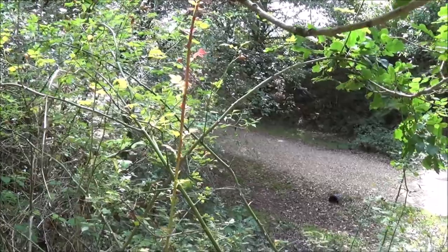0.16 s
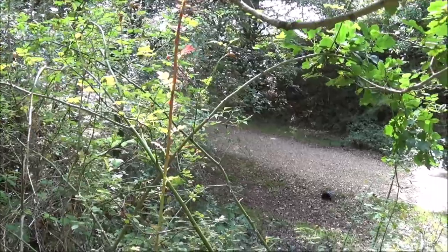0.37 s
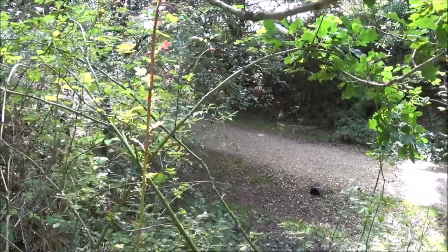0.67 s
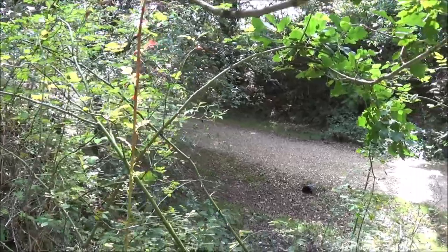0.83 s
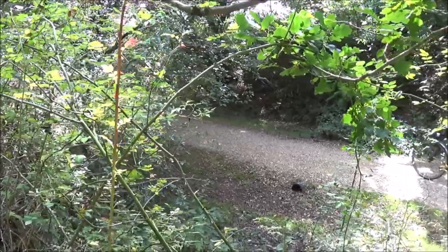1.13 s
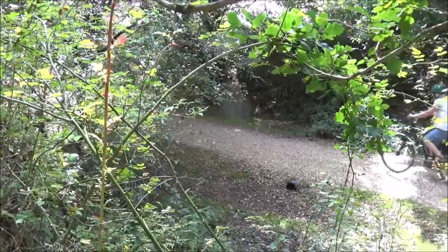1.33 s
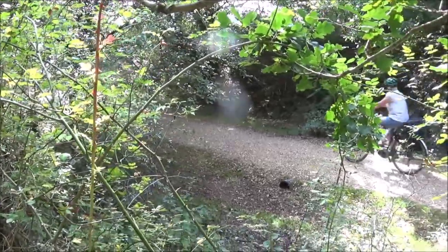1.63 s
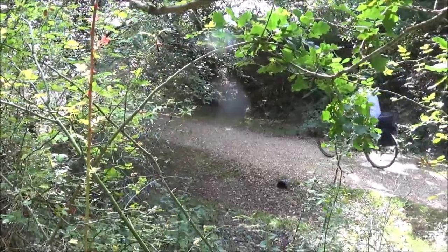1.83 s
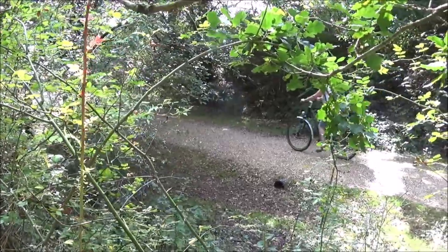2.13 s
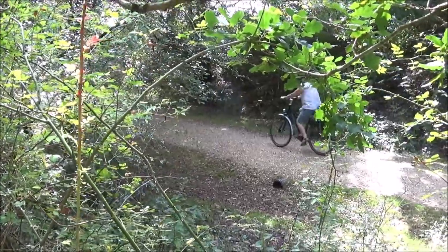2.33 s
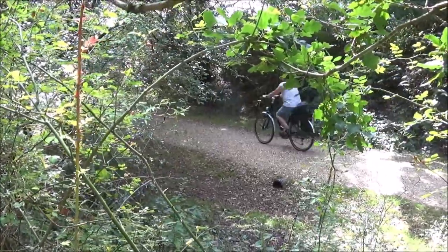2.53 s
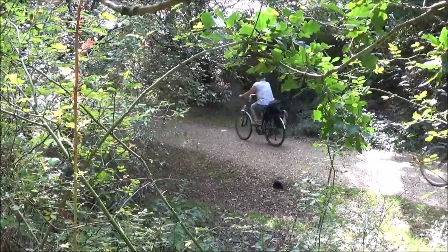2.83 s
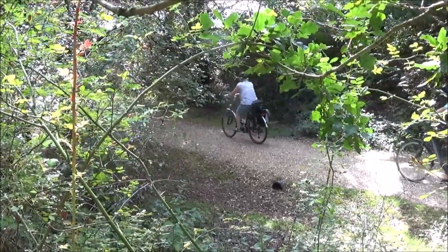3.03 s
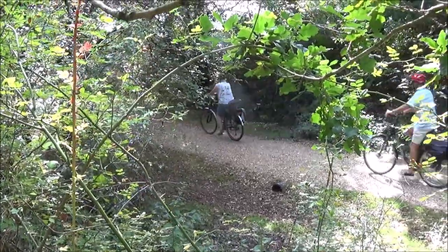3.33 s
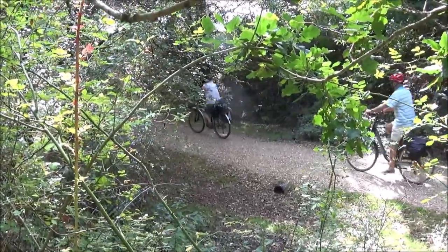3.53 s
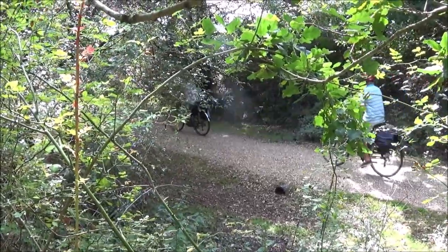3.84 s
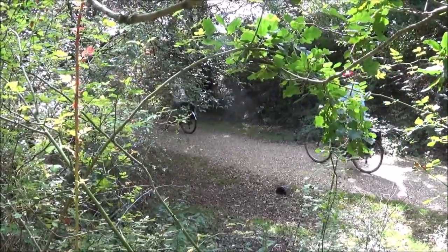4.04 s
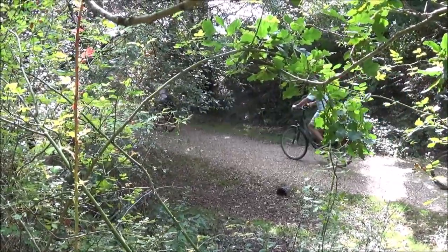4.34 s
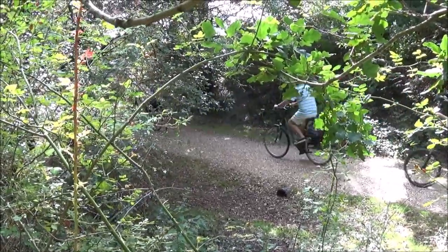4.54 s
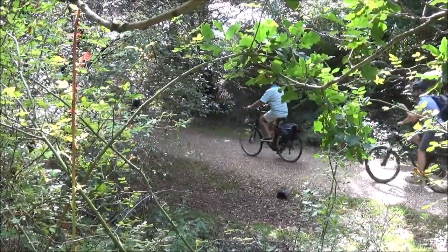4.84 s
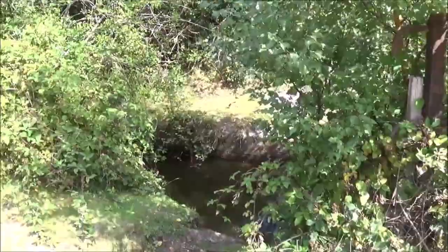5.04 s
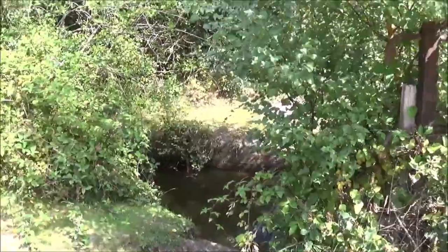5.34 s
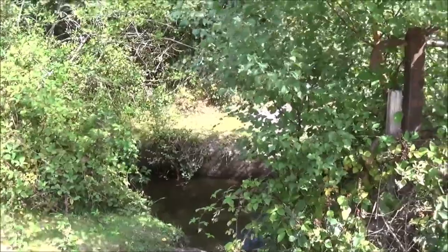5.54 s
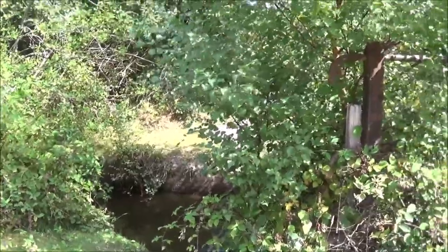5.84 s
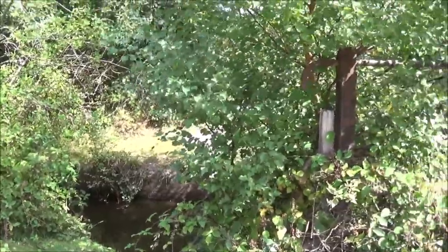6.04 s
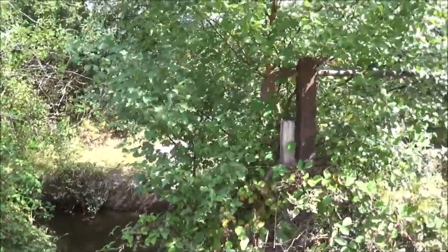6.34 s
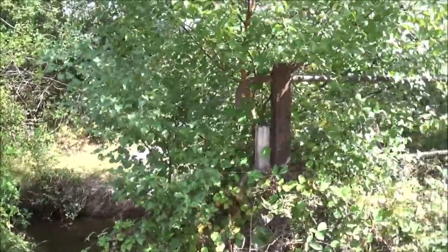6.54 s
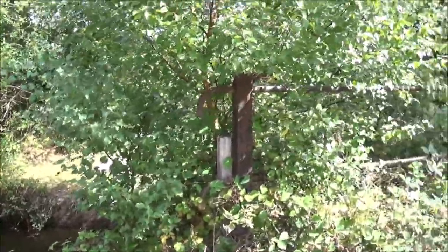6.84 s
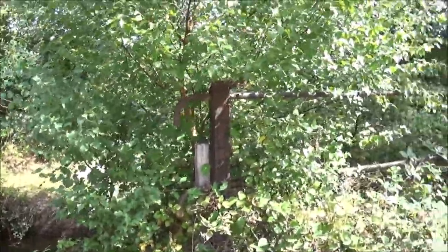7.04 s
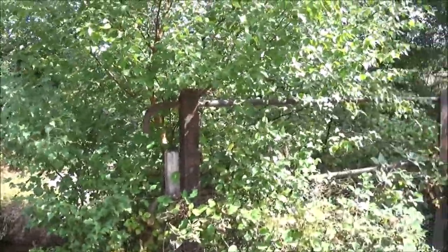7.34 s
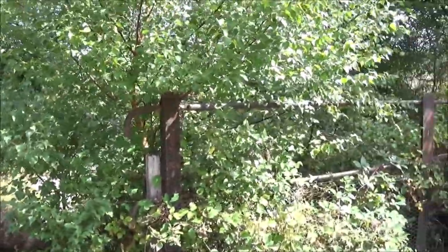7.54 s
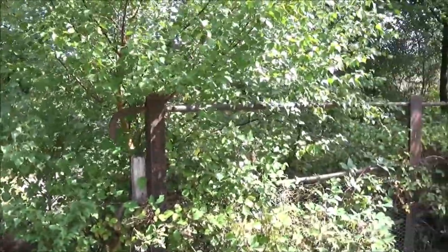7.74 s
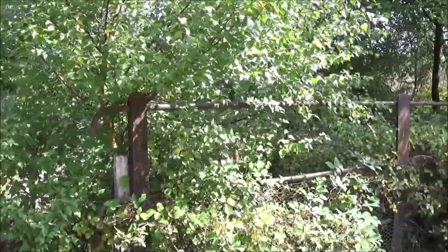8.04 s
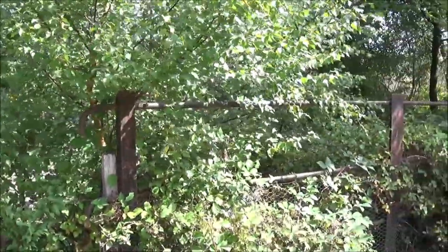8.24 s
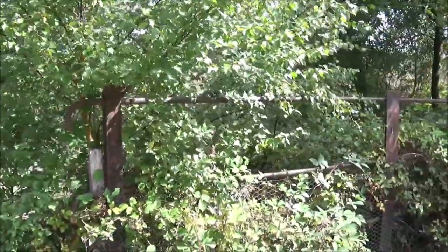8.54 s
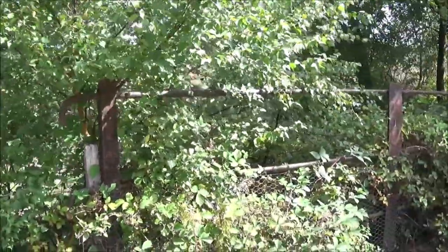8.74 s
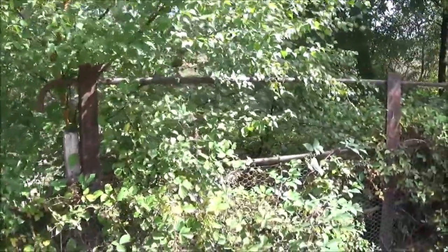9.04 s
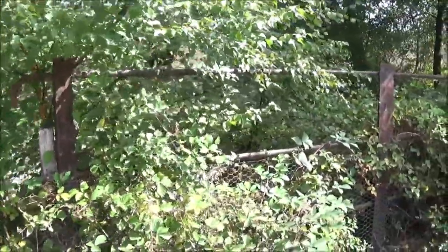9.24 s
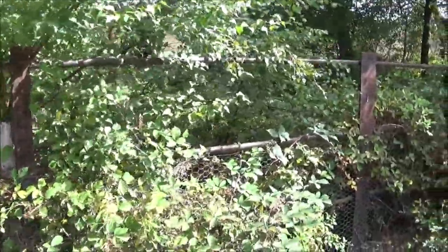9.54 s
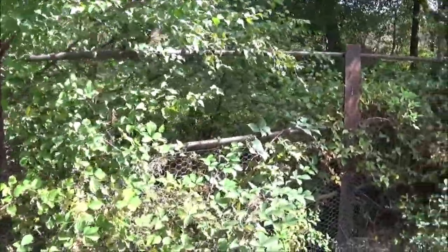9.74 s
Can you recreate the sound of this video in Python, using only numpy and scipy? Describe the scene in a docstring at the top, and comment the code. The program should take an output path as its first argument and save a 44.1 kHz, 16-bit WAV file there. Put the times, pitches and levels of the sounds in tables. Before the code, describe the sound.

Outdoor stereo sound, close to a gravel track. Coarse grinding and fine gritty crunching swell three or four times a second, scattered with hard ringing stone snaps and a short woodland echo. Halfway through it stops suddenly. A calm spot by water follows, with gentle hissing leaves and soft murmur, a thin high motor whine ticking rapidly, a few dry leaf scrapes and low wind puffs.

```python
"""Bicycles on gravel, then a quiet stream

Bicycles roll along a gravel path in a wood, starting on the right and drifting towards the middle:
grains of grit crunch in surges, three or four a second, and stones pop and crack as ringing snaps
with a short scattered tail. After five seconds the scene changes to a quiet spot by a stream:
steady noise for leaves and water, the faint pulsing whine of a zoom motor,
bursts of grains where undergrowth brushes by, and soft low puffs of air on the microphone."""
import sys
import numpy as np
from scipy import signal
from scipy.fft import rfft, irfft, next_fast_len
from scipy.io import wavfile

SR = 44100
rng = np.random.default_rng(int(sys.argv[2]) if len(sys.argv) > 2 else 0)


def log_audio(samples):
    """Write samples as a 16-bit WAV file to the path given in sys.argv[1]."""
    # one column per channel
    frames = np.atleast_2d(samples).T
    # limit to full scale, then quantise
    limited = np.clip(frames, -1, 1)
    pcm = np.round(limited * 32767).astype(np.int16)
    wavfile.write(sys.argv[1], SR, pcm)


N = 435708
TIME = np.arange(N) / SR
CUT_S = 5.027  # the path gives way to the stream


def from_db(db):
    """Decibels to gain."""
    return 10 ** (np.asarray(db) / 20)


def rms_one(x):
    """Scale to rms 1."""
    return x / np.sqrt(np.mean(x ** 2) + 1e-20)


def in_time(rows):
    """Each column of a curve at every sample."""
    s, *columns = np.transpose(rows)
    return [np.interp(TIME, s, column) for column in columns]


def at_hz(points, hz):
    """Read a spectrum on a log-frequency axis."""
    point_hz, values = np.transpose(points)
    return np.interp(np.log(hz + 1), np.log(point_hz), values)


def panned(pan_db):
    """Left and right gains for a left-right level difference (positive is left)."""
    pan_db = np.atleast_1d(pan_db)
    return from_db(np.array([pan_db, -pan_db]) / 2)


def drift(rate):
    """Random values of spread 1, drawn rate times a second and joined by straight lines."""
    return np.interp(TIME * rate, np.arange(4096), rng.standard_normal(4096))


def swell(s, length):
    """A bell-shaped rise and fall, its peak at s and its standard deviation length."""
    return np.exp(-.5 * np.minimum(((TIME - s) / length) ** 2, 100))


def response(spectrum, pitch_hz=1000, ring_db=0, octaves=0.33, tilt_db=0, size=2048):
    """Minimum-phase impulse response of a spectrum, with a broad resonance and a tilt about its pitch."""
    hz = np.arange(size // 2 + 1) * SR / size
    away = np.log2((hz + 1) / pitch_hz)
    resonance_db = ring_db / (1 + (away / octaves) ** 2)
    level_db = at_hz(spectrum, hz) + resonance_db + tilt_db * away
    # folding the cepstrum puts the energy as early as possible
    cepstrum = irfft(np.log(from_db(level_db)))
    cepstrum[0] /= 2
    return irfft(np.exp(rfft(2 * cepstrum[:size // 2], size)))


def through(x, impulse):
    """Pass a stereo signal through an impulse response."""
    return signal.oaconvolve(x, np.atleast_2d(impulse), axes=1)[:, :N]


def resonance(x, hz, width_hz):
    """A two-pole resonance: the narrower it is, the longer it rings."""
    r = np.exp(-np.pi * width_hz / SR)
    return signal.lfilter([1, 0, -1], [1, -2 * r * np.cos(2 * np.pi * hz / SR), r * r], x)


def grains(per_s, size_db, spread_db):
    """Random stereo clicks: many small, a few large, each from its own direction."""
    born = rng.random(N) < per_s / SR
    heights = from_db(size_db * np.minimum(rng.exponential(1, N), 4))
    signs = rng.choice([-1, 1], N)
    return born * heights * signs * panned(spread_db * rng.standard_normal(N))


# Likeness of the left and right channels. Each row: frequency in Hz, correlation from 0 to 1.
STEREO_LIKENESS = [(50, .85), (200, 0.98), (600, 0.91), (1400, 0.52), (3100, 0.55), (6500, 0.53),
                   (9000, 0.99), (15000, 1)]


def wash(spectrum):
    """Countless far sources merge into stereo noise; rms 1."""
    size = next_fast_len(N)
    hz = np.arange(size // 2 + 1) * SR / size
    alike = np.clip(at_hz(STEREO_LIKENESS, hz), 0, 1)
    mid, side = rfft(rng.standard_normal((2, size))) * from_db(at_hz(spectrum, hz))
    left_right = np.sqrt(1 + alike) * mid + np.sqrt(1 - alike) * side * [[1], [-1]]
    return rms_one(irfft(left_right, size)[:, :N])


# Colour of the wood's air. Each row: frequency in Hz, relative level in dB per Hz.
WOOD_COLOUR = [(20, -45), (50, -19), (100, -14), (200, -6), (500, 1.5), (1200, -2), (4000, 2.5),
               (8000, -18.5), (15500, -24.5)]


def wood():
    """The distant wood is a steady coloured noise."""
    return from_db(-47.5) * wash(WOOD_COLOUR)


# Low drone behind the path. Each row: time in seconds, rms of the upper hum in dB.
DRONE_LEVEL = [(0, -77), (1.2, -81), (1.6, -65.5), (2.1, -70), (2.5, -82), (5, -71.5)]


def drone(hz=184, width_hz=12, lower_db=-13):
    """Noise through narrow resonances gives a faint wavering hum with its lower octave."""
    level_db, = in_time(DRONE_LEVEL)
    upper, lower = rng.standard_normal((2, N))
    upper_hum = rms_one(resonance(upper, hz, width_hz))
    lower_hum = rms_one(resonance(lower, hz / 2, width_hz / 2))
    return from_db(level_db) * (upper_hum + from_db(lower_db) * lower_hum)


# Colours of water and leaves. Each row: frequency in Hz, relative level in dB per Hz.
STREAM_COLOUR = [(20, -48), (55, -27), (120, -16), (250, -3), (550, 1.5), (850, 1), (1500, -3),
                 (2500, -7.5), (5000, -39)]
LEAF_COLOUR = [(500, -23), (1500, -9), (2200, -3.5), (3200, 0), (4000, -0.5), (4500, -2.5), (5000, -4),
               (5700, -9.5), (8000, -19), (15500, -26.5)]
# Loudness by the stream, before trims. Each row: time in seconds, stream in dB, leaves in dB.
BREEZE_LEVELS = [(5.1, -50.5, -49), (6.06, -51, -48.5), (6.36, -50.5, -48.5), (7.2, -51.5, -49.5),
                 (7.91, -50.5, -49), (8.45, -49.5, -48), (9.69, -49.5, -48.5), (9.88, -49.5, -48.5)]


def streamside():
    """Water murmurs and leaves hiss as the breeze wavers."""
    stream_db, leaves_db = in_time(BREEZE_LEVELS)
    stream = from_db(stream_db + 0.9 + .5 * drift(14)) * wash(STREAM_COLOUR)
    leaves = from_db(leaves_db + 0.72 + 0.42 * drift(25)) * wash(LEAF_COLOUR)
    return (stream + leaves) * panned(-.4)


# Colour of an air puff. Each row: frequency in Hz, relative level in dB per Hz.
PUFF_COLOUR = [(20, -24), (50, 0), (80, -2), (140, -2), (250, -23), (600, -55)]
# Air on the microphone. Each row: peak time in seconds, bell width in seconds, rms at the peak in dB.
AIR_PUFFS = [(5.524, 0.033, -64), (8.6, 0.1, -73), (8.895, 0.042, -61), (9.22, 0.11, -72)]


def puffs():
    """Air buffets the microphone as low noise that swells and fades."""
    envelope = sum(from_db(level_db) * swell(s, length) for s, length, level_db in AIR_PUFFS)
    return wash(PUFF_COLOUR) * envelope


# Dull knocks and faint short tones.
# Each row: peak time in seconds, bell width in seconds, rms in dB, pitch in Hz, resonance width in Hz.
DULL_KNOCKS = [(2.372, 0.017, -52, 343, 100), (2.453, 0.01, -43.5, 533, 400), (4.023, 0.014, -43, 580, 280),
               (5.63, 0.062, -54.5, 922, 40), (6.411, 0.015, -48.5, 630, 170)]


def knocks():
    """Short narrow resonances stirred by noise."""
    out = np.zeros(N)
    for s, length, level_db, hz, width_hz in DULL_KNOCKS:
        shape = swell(s, length)
        tone = resonance(resonance(rng.standard_normal(N), hz, width_hz), hz, width_hz)
        ring = shape * tone
        out += from_db(level_db) * ring * np.linalg.norm(shape) / np.linalg.norm(ring)
    return out


# Colour of scraping leaves. Each row: frequency in Hz, relative level in dB per Hz.
BRUSH_COLOUR = [(20, -76), (150, -38), (600, 4), (1500, 3.5), (3500, 7), (5000, 0), (7500, -15.5),
                (12500, -14.5), (15500, -23)]
# Undergrowth close by.
# Each row: peak time in seconds, bell width in seconds, rms in dB, treble tilt in dB per octave.
BRUSH_STROKES = [(6.238, 0.017, -44.5, 2.5), (6.265, 0.006, -47, 1.5), (6.325, 0.015, -49, 3),
                 (6.379, .008, -49, 2), (6.413, 0.0069, -42.5, 1), (8.593, 0.012, -41.5, -3),
                 (9.05, 0.017, -47.5, -4.5), (9.29, .014, -49, 0), (9.703, .004, -48, -2)]


def brushes():
    """Leaves scrape in short bursts of tiny slips."""
    slips = rms_one(grains(per_s=1900, size_db=2.5, spread_db=5.5))
    out = 0
    for s, length, level_db, tilt_db in BRUSH_STROKES:
        colour = response(BRUSH_COLOUR, tilt_db=tilt_db)
        colour = colour / np.linalg.norm(colour)
        out = out + through(slips * swell(s, length), from_db(level_db) * colour)
    return out


# Zoom motor. Each row: time in seconds, rms of the whine in dB, whine pitch in Hz.
ZOOM_MOTION = [(5.1, -61, 3950), (6.3, -60.5, 3900), (6.8, -60.5, 3970), (7.4, -58.5, 4060),
               (7.7, -65, 4020), (8.4, -67, 3950), (9.88, -68, 3950)]
ZOOM_STEPS_PER_S, ZOOM_FIRST_S, ZOOM_BURST_S = 25, 5.103, .004  # burst length is a bell width


def zoom_motor(barrel_hz=2500, barrel_width_hz=35, barrel_db=-1.5, overtone_db=-8.5):
    """The motor moves in short regular bursts: each one whines and sets the lens barrel ringing."""
    level_db, whine_hz = in_time(ZOOM_MOTION)
    steps = (TIME - ZOOM_FIRST_S) * ZOOM_STEPS_PER_S
    from_step = ((steps + .5) % 1 - .5) / ZOOM_STEPS_PER_S  # seconds from the nearest burst
    bursts = np.exp(-.5 * (from_step / ZOOM_BURST_S) ** 2) * from_db(3.6 * drift(25))
    whine = rms_one(bursts * np.sin(2 * np.pi * np.cumsum(whine_hz + 28 * drift(120)) / SR))
    shake = bursts * np.sin(2 * np.pi * np.cumsum(barrel_hz + 25 * drift(120)) / SR)
    barrel = from_db(barrel_db) * rms_one(resonance(shake, barrel_hz, barrel_width_hz))
    rattle = bursts * rng.standard_normal(N)
    overtone = from_db(overtone_db) * rms_one(resonance(rattle, 2 * barrel_hz, 150))
    return from_db(level_db) * (whine + barrel + overtone)


def woodland(x, scatter_db, t60, bank_db, bank_s, size=12000, count=8):
    """Trunks and leaves scatter a tail, bushes smear an echo; eight random tails crossfade in a cycle."""
    age = np.arange(size) / SR
    scatter = from_db(scatter_db - 60 * age / t60)
    bank = from_db(bank_db) * np.exp(-((age - bank_s) / 0.0023) ** 2)
    tail = (scatter + bank) * np.minimum(age / 0.0022, 1)
    place = TIME * 20 % count  # 20 tails a second
    out = x
    for k in range(count):
        nearness = np.maximum(1 - np.abs((place - k + 1) % count - 1), 0)
        noise = rng.standard_normal(size) + 0.7 * rng.standard_normal((2, size))
        out = out + through(x * np.sqrt(nearness), tail * noise)
    return out


# Steady rolling as the bicycles come and go, before trims.
# Each row: time in seconds, fine grit in dB, coarse grinding in dB, sandy sizzle in dB.
ROLLING_LEVELS = [(0.0, -44.5, -49, -76), (0.2, -46.5, -51, -76), (0.65, -42.5, -50, -69),
                  (1.25, -40, -46.5, -63.5), (1.6, -40, -45, -58), (2.1, -36.5, -41.5, -54),
                  (2.4, -43, -46, -61), (2.95, -41, -50, -62), (3.6, -40.5, -51, -63),
                  (4.2, -38, -45.5, -60.5), (5.0, -37.5, -47, -58)]
# The tyres plough into looser gravel. Each row: start in seconds, time to the release in seconds,
# rise of the grit in dB, rise of the grinding in dB.
GRAVEL_SURGES = [(0.238, 0.126, 4.5, 4), (0.492, 0.062, 5, 7), (0.778, 0.056, 3.5, 2), (1.057, 0.057, 3, 2),
                 (1.376, .13, 5, 3.5), (1.71, 0.026, 4.5, 4.5), (1.859, 0.19, 2.5, 2.5), (2.21, .1, 2, 1.5),
                 (2.467, 0.16, 5.5, .5), (2.76, 0.097, 2.5, 4.5), (2.972, 0.045, 3, 7),
                 (3.123, 0.044, 3.5, 2), (3.379, .05, 5.5, 4), (3.676, .18, 3, 4.5), (4.004, 0.19, 2, -3),
                 (4.204, 0.069, 2, 1), (4.745, 0.046, 0.5, 3), (4.874, 0.14, 2.5, 0.5)]
SURGE_ATTACK_S, SURGE_RELEASE_S = 0.012, 0.027
SAND_SHARE = 0.69  # share of the grit's rise that the sand follows
UNEVEN_DB, UNEVEN_PER_S = 1.0, 28  # the bed is uneven under the tyres


def rolling():
    """Levels in dB of grit, grinding and sand: surges rise quickly, hold and die back to steady rolling."""
    grit_db, grinding_db, sand_db = in_time(ROLLING_LEVELS)
    grit_rise, grinding_rise = np.zeros((2, N))
    for s, length, grit_rise_db, grinding_rise_db in GRAVEL_SURGES:
        age = TIME - s
        attack = np.clip(age / SURGE_ATTACK_S, 0, 1)
        release = np.exp(-np.clip((age - length) / SURGE_RELEASE_S, 0, 20))
        shape = attack * release
        grit_rise = np.maximum(grit_rise, grit_rise_db * shape)
        grinding_rise = np.maximum(grinding_rise, grinding_rise_db * shape)
    bumps = UNEVEN_DB * drift(UNEVEN_PER_S)
    sand_rise = SAND_SHARE * (grit_rise + bumps)
    return grit_db + grit_rise + bumps, grinding_db + grinding_rise + bumps, sand_db + sand_rise


SLIPS_PER_S, SETTLE_S, SLIP_DEPTH = 70, .004, 2.2


def crunch(spectrum, per_s, size_db, ring_db, low_hz, high_hz, count=7):
    """The bed slips suddenly and settles again; every size of stone clicks at its own pitch; rms 1."""
    slips = (rng.random(N) < SLIPS_PER_S / SR) * rng.random(N)
    settling = signal.lfilter([1], [1, -np.exp(-1 / (SETTLE_S * SR))], slips + 1e-18)
    stir = 1 + SLIP_DEPTH * settling  # a slip makes clicks both denser and louder
    clicks = np.sqrt(stir) * grains(per_s * stir, size_db, spread_db=4.5)
    dealt = rng.integers(0, count, N)
    out = 0
    for k, hz in enumerate(np.geomspace(low_hz, high_hz, count)):
        out = out + through(clicks * (dealt == k), rms_one(response(spectrum, hz, ring_db)))
    return rms_one(out)


# Colour of a struck stone. Each row: frequency in Hz, relative level in dB per Hz.
STONE_COLOUR = [(100, -40), (300, -30), (550, -15), (1300, -9), (2000, -6), (2600, -3.5), (3200, 1.5),
                (4000, -5), (5000, -16), (6000, -24), (8000, -39), (15500, -41)]
# Stones crushed in a quick run of cracks. Each row: start in seconds, starting level in dB, pitch in Hz.
STONE_CRUSHES = [(0.503, -29, 4300), (1.124, -26, 3120), (1.641, -35, 6700), (1.722, -30.5, 3230),
                 (1.91, -23, 3320), (2.118, -24.5, 6860), (2.204, -30.5, 6000), (2.242, -21, 5300),
                 (2.547, -32, 7500), (2.775, -25.5, 1390), (2.853, -31, 7600), (2.869, -24, 3940),
                 (3.672, -23.5, 1730)]


def crushes(fade_s=0.0054, ring_db=15, hard_db=12, size=2048):
    """A stone breaks under the tyre: dense cracks that start at once and die away."""
    out, age = np.zeros((2, N + size)), np.arange(size) / SR
    for s, level_db, hz in STONE_CRUSHES:
        colour = response(STONE_COLOUR, hz, ring_db + hard_db * max(np.log2(hz / 3500), 0))
        colour = colour / np.linalg.norm(colour)
        noise = rng.standard_normal(size) + 0.26 * rng.standard_normal((2, size))
        cracks = noise * np.exp(-age / fade_s)
        sound = signal.fftconvolve(cracks, colour[None], axes=1)[:, :size]
        start = round(s * SR)
        out[:, start:start + size] += from_db(level_db) * sound
    return out[:, :N]


SMALL_POPS_PER_S, SMALL_POP_DB, SMALL_POP_SPREAD_DB = 9, -20.5, 1
SMALL_POP_FOLLOWS = 0.63  # share of the grit's swing that their peaks follow
SMALL_POP_HZ, SMALL_POP_OCTAVES, SMALL_POP_PAN_SPREAD_DB = 2400, 0.57, 0.5


def small_pops(grit_db, pan_db, count=400):
    """Random rows of smaller stones: in a harder crunch they are likelier and louder."""
    place, chance = rng.random((2, count))
    size, pitch, side = np.clip(rng.standard_normal((3, count)), -2, 2)
    s = (np.arange(count) + place) / count * CUT_S
    at = (s * SR).astype(int)
    effort = from_db(grit_db[at])
    swing_db = grit_db[at] - grit_db[at].mean()
    peak_db = SMALL_POP_DB + SMALL_POP_FOLLOWS * swing_db + SMALL_POP_SPREAD_DB * size
    hz = SMALL_POP_HZ * 2 ** (SMALL_POP_OCTAVES * pitch)
    rows = np.column_stack([s, peak_db, hz, pan_db[at] + SMALL_POP_PAN_SPREAD_DB * side])
    flying = round(SMALL_POPS_PER_S * CUT_S)
    return rows[np.argsort(chance / effort)[:flying]]


POP_RING_OCTAVES = .55


def stone_pops(stones, ring_db, hard_db, size_tilt_db, chatter_db, chatter_s, bounce_db, bounce_s, size=2048):
    """A sharp snap, its bounce off the ground, then a brief chatter of the grit that the stone disturbs."""
    out, age = np.zeros((2, N + size)), np.arange(size) / SR
    for s, peak_db, hz, pan_db in stones:
        smallness = np.log2(hz / 3500)  # small hard stones ring more clearly, large ones are dull
        stone_ring_db = ring_db + hard_db * max(smallness, 0)
        tilt_db = size_tilt_db * min(smallness, 0)
        snap = response(STONE_COLOUR, hz, stone_ring_db, POP_RING_OCTAVES, tilt_db)
        snap = snap / np.abs(signal.hilbert(snap)).max()
        grit = rng.standard_normal(size) + 0.67 * rng.standard_normal((2, size))
        chatter = np.exp(-age / chatter_s) * np.minimum(age / 0.00051, 1)
        contacts = from_db(chatter_db) * grit * chatter
        contacts[[0, 1], rng.integers(0, 2, 2)] = 1  # the snap may reach one ear a sample earlier
        contacts[:, round(bounce_s * rng.uniform(.8, 1.2) * SR)] += from_db(bounce_db)
        sound = signal.fftconvolve(contacts, snap[None], axes=1)[:, :size]
        start = round(s * SR)
        out[:, start:start + size] += from_db(peak_db) * panned(pan_db) * sound
    return out[:, :N]


# Colours of fine grit, coarse bed and sand. Each row: frequency in Hz, relative level in dB per Hz.
GRIT_COLOUR = [(500, -36), (1400, -10), (2100, -9), (2650, -2.5), (3150, 3), (4000, -3), (5000, -10.5),
               (5600, -20), (8000, -32), (15500, -44)]
GRINDING_COLOUR = [(60, -33), (150, -20.5), (300, -11.5), (500, -4), (900, 1), (1500, 1), (2200, -1),
                   (3500, -19), (7000, -28)]
SAND_COLOUR = [(2000, -21), (4500, 4.5), (6300, 5.5), (7200, 0.5), (8200, -4.5), (12000, -10.5),
               (15500, -36)]
# Where the tyres are. Each row: time in seconds, left-right difference in dB (positive is left).
TYRE_BEARING = [(0, -7), (.75, -7), (1.5, -4), (2.75, -4), (3.75, -2.5), (5, -1.2)]
# The loudest stones snapping out from under the tyres.
# Each row: start in seconds, snap peak in dB, pitch in Hz, left-right difference in dB.
LOUD_POPS = [(0.2226, -20, 3000, -4), (0.2484, -11, 900, -7), (0.2926, -19, 1100, -8),
             (0.3595, -15, 1700, -4), (1.1051, -15, 3000, -5), (1.1262, -11, 2600, -1),
             (1.4139, -12, 1900, -6), (1.5242, -16, 4300, -1), (1.7402, -14, 2600, -2),
             (1.8585, -16, 1000, 0), (1.8917, -14, 3200, -3), (1.9276, -9, 4400, -1),
             (1.9458, -10, 1800, -1), (1.9688, -14, 2600, -2), (2.0039, -11, 2200, -1),
             (2.0116, -15, 2400, -9), (2.0229, -12, 4000, -1), (2.1185, -8, 6200, -1),
             (2.2441, -14, 4500, 0), (2.2998, -15, 1600, -1), (2.5495, -13, 5900, 0), (2.6974, -13, 900, 1),
             (2.8301, -16, 4700, 1), (2.8368, -10, 1800, -8), (2.8548, -15, 6600, -1),
             (2.8703, -12, 1400, -2), (3.0671, -16, 6600, -2), (3.1836, -13, 4700, 1),
             (3.3026, -17, 2700, -3), (3.4, -12, 3800, -1), (3.4109, -12, 3900, -1),
             (3.5326, -18, 2300, -1), (3.6795, -12, 2200, -5), (3.7357, -15, 2000, -4),
             (3.786, -16, 1500, 1), (4.1118, -12, 5900, 1), (4.2778, -13, 2800, -3), (4.4191, -15, 1700, 0),
             (4.6755, -6, 4100, 0), (4.8264, -6, 1800, -3)]


def bicycles():
    """Tyres crush fine grit, grind the coarse bed, spray sand and pop or crush single stones."""
    grit_db, grinding_db, sand_db = rolling()
    pan_db, = in_time(TYRE_BEARING)
    grit = from_db(grit_db + 0.3) * crunch(
        GRIT_COLOUR, per_s=800, size_db=2.5, ring_db=10.5, low_hz=1760, high_hz=4950)
    grinding = from_db(grinding_db) * crunch(
        GRINDING_COLOUR, per_s=900, size_db=3.0, ring_db=8.5, low_hz=483, high_hz=1950)
    sand = from_db(sand_db + 1.8) * crunch(
        SAND_COLOUR, per_s=500, size_db=3.5, ring_db=2.0, low_hz=5000, high_hz=11000, count=4)
    bed = (grit + crushes()) * panned(pan_db + 1.4) + grinding * panned(pan_db - 0.2) + sand
    stones = [*LOUD_POPS, *small_pops(grit_db, pan_db)]
    pops = stone_pops(stones, ring_db=8.0, hard_db=7.5, size_tilt_db=0.93, chatter_db=-24.5,
                      chatter_s=0.0031, bounce_db=-11.5, bounce_s=0.002214)
    return woodland(bed + pops, scatter_db=-42, t60=0.37, bank_db=-47.5, bank_s=0.0434)


GAP_S, FADE_S = .008, .02  # the path is gone this long before the cut; length of each fade


def scene():
    """The path, a brief dip at the cut, then the streamside."""
    path = bicycles() + drone() + wood()
    before = np.clip((CUT_S - GAP_S - TIME) / FADE_S, 0, 1)
    after = np.clip((TIME - CUT_S) / FADE_S, 0, 1)
    # the streamside already seeps in softly while the path fades
    spot = (streamside() + zoom_motor()) * np.maximum(after, 0.17 * (1 - before))
    return before * path + spot + brushes() + knocks() + puffs()


CUTOFF_HZ = 15750


def record(dry):
    """The top of the band is cut steeply."""
    lowpass = signal.firwin(511, CUTOFF_HZ, fs=SR)
    return signal.oaconvolve(dry, lowpass[None], "same", axes=1)


dry = scene()
out = record(dry)
log_audio(out)
```